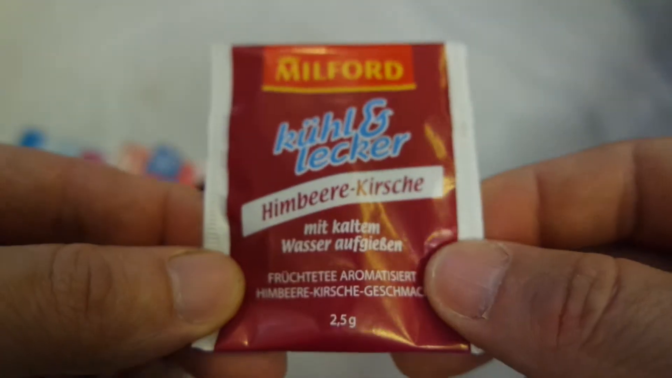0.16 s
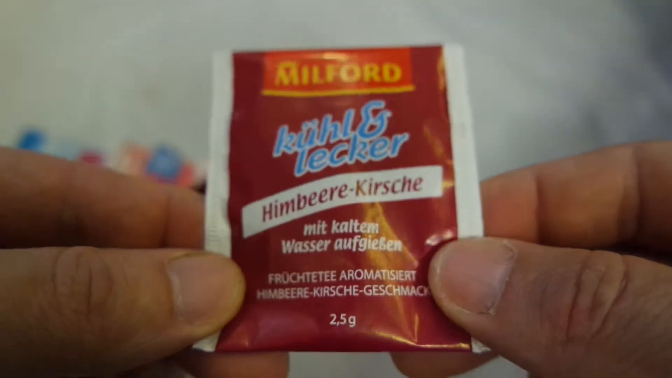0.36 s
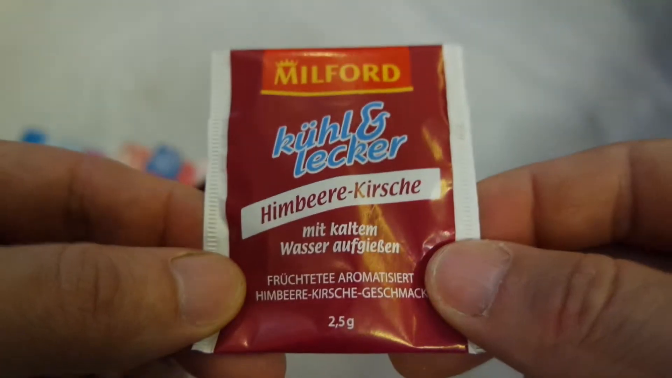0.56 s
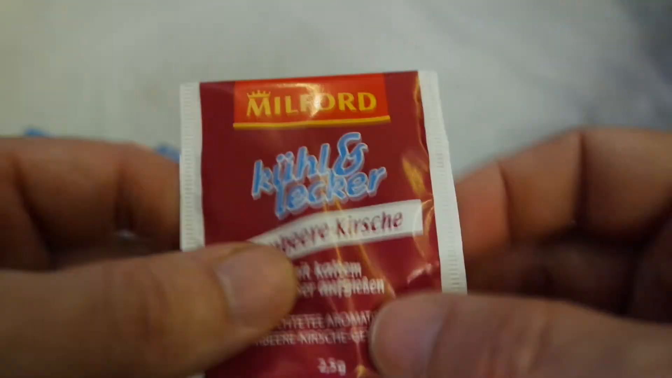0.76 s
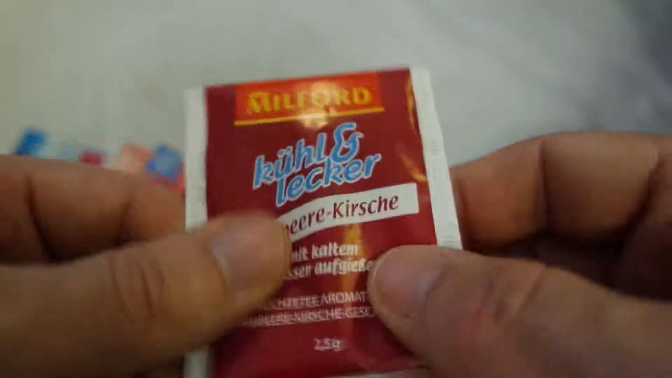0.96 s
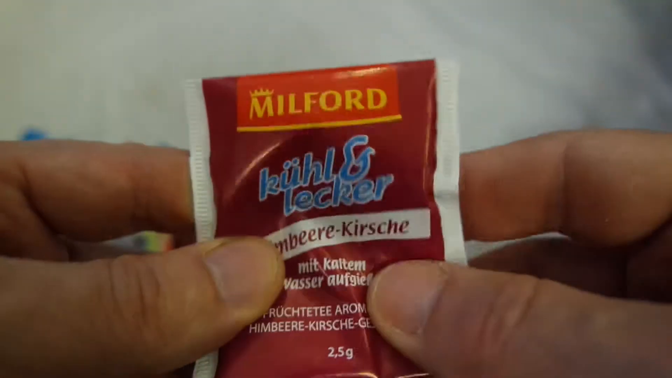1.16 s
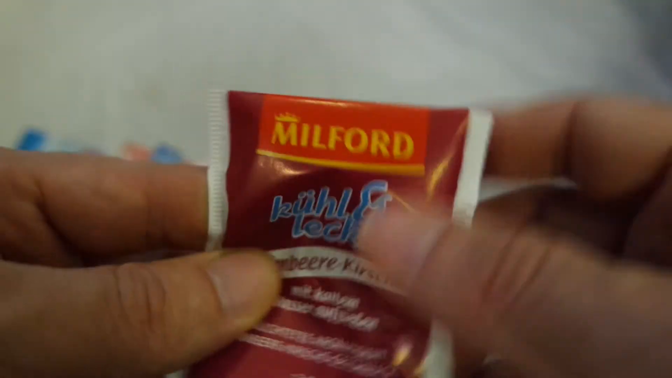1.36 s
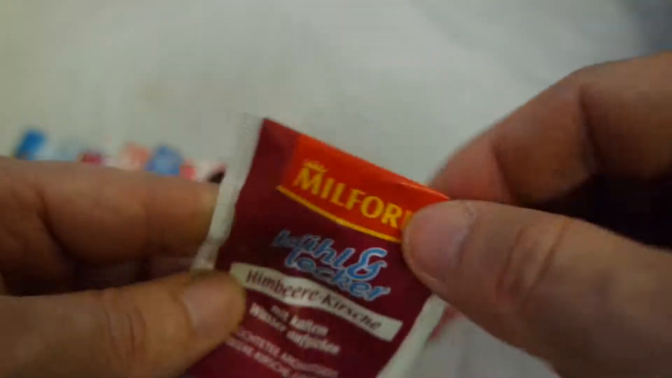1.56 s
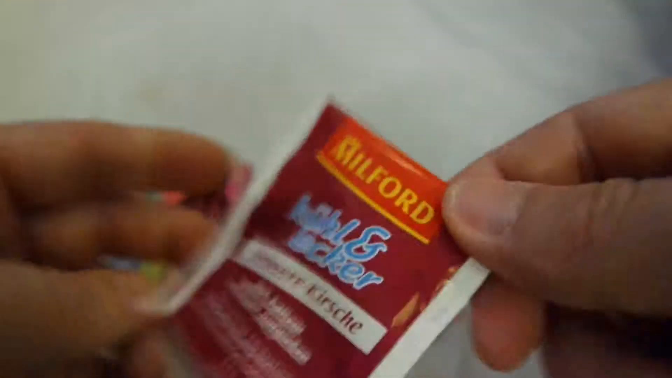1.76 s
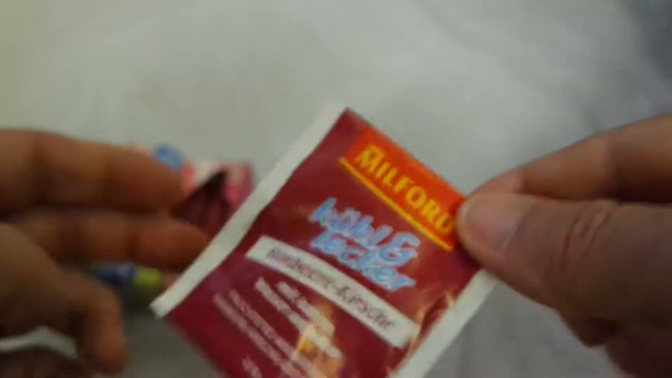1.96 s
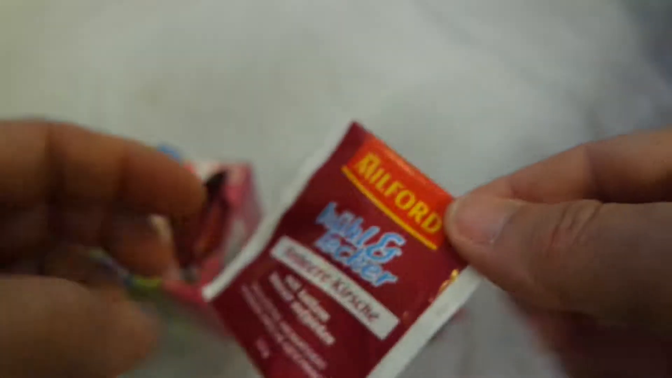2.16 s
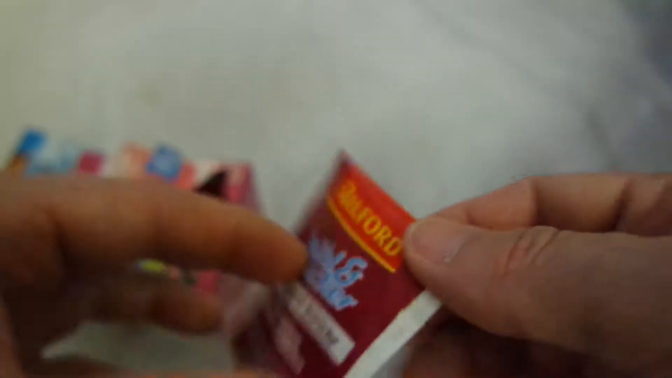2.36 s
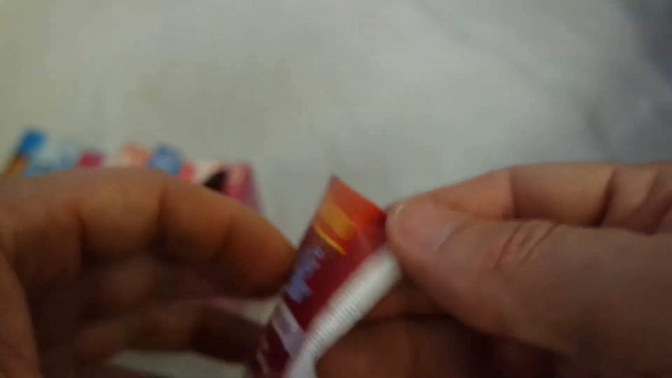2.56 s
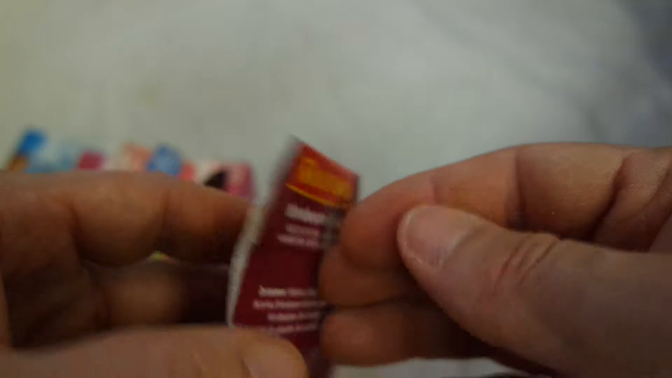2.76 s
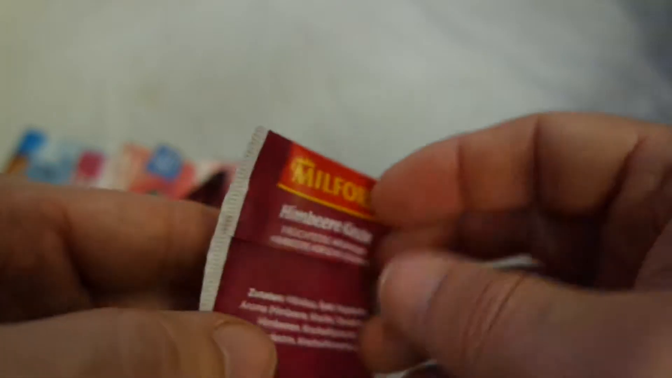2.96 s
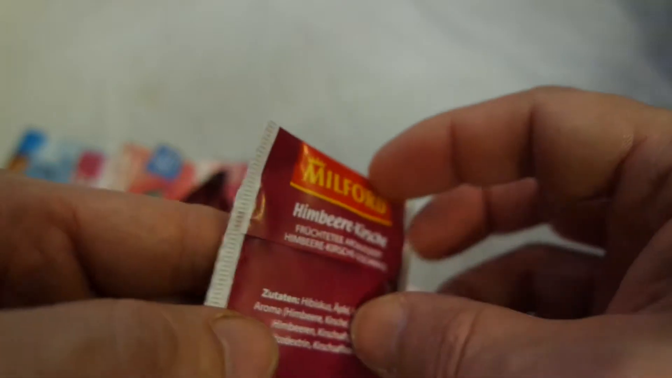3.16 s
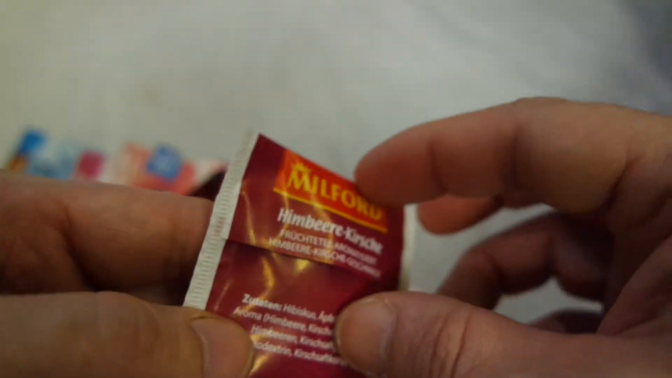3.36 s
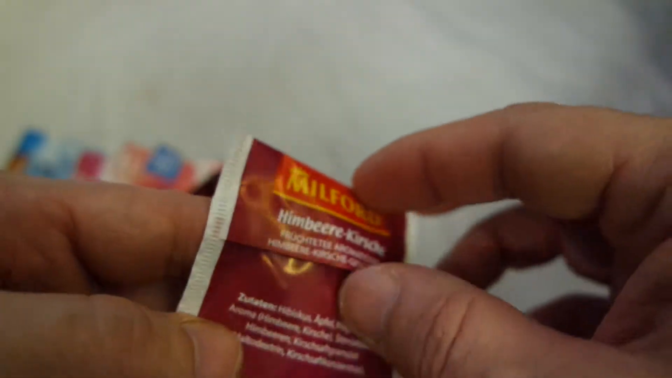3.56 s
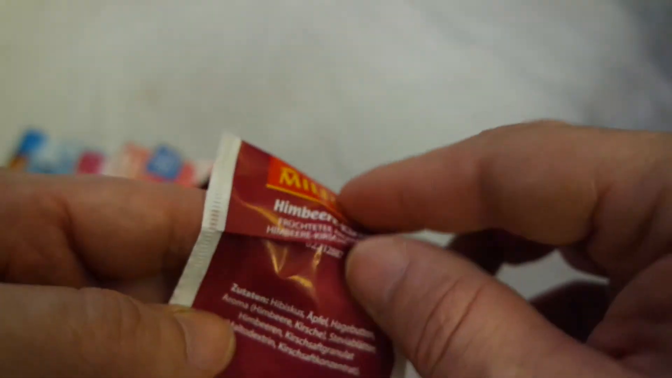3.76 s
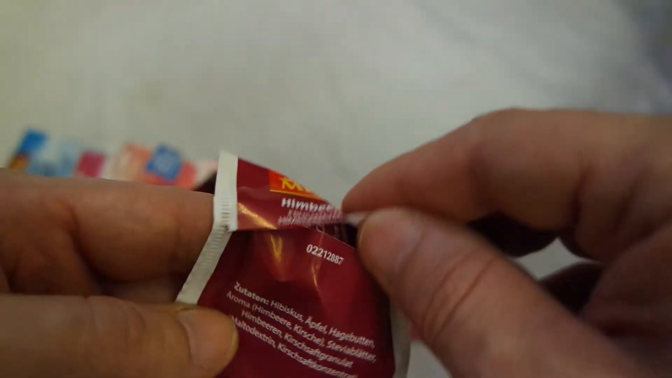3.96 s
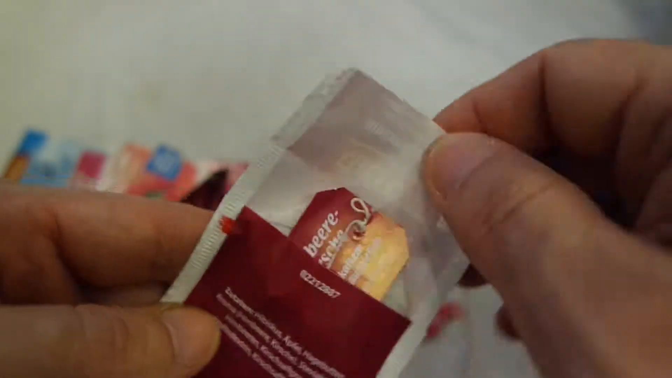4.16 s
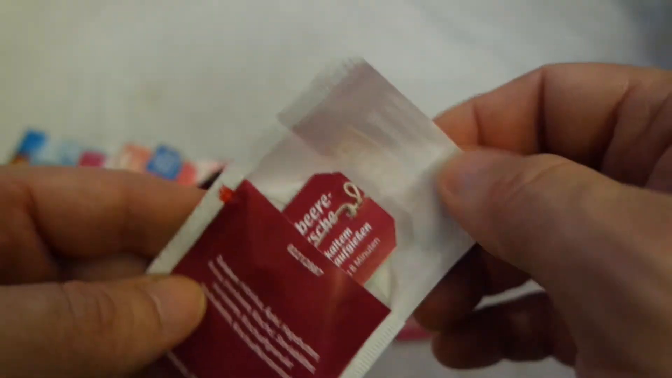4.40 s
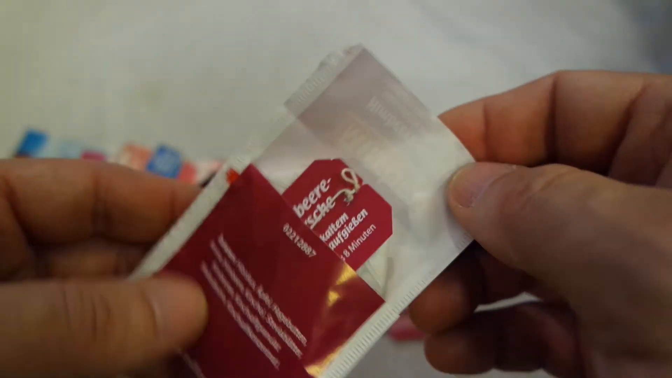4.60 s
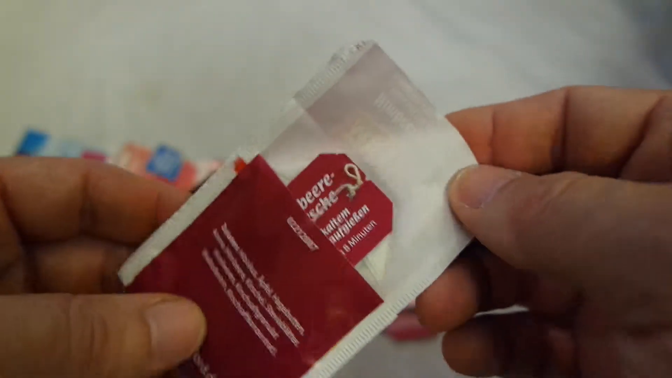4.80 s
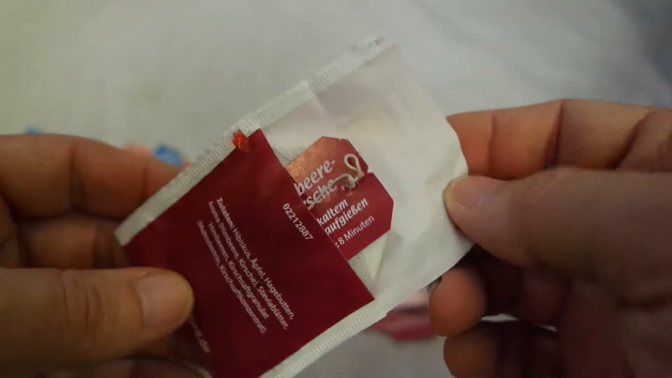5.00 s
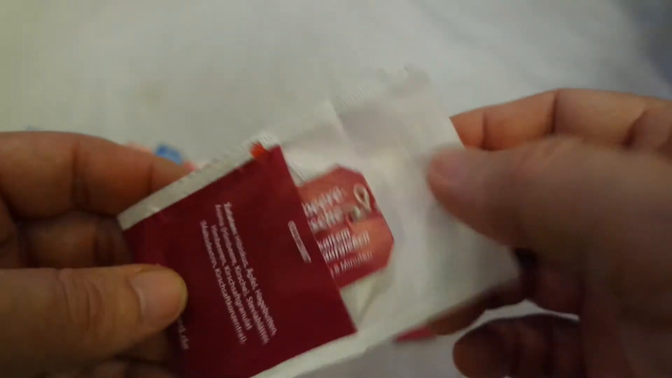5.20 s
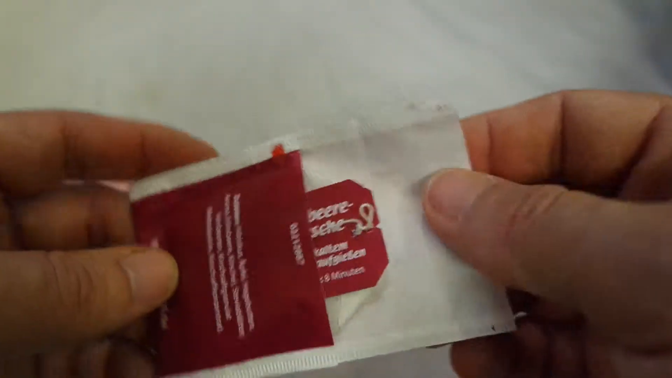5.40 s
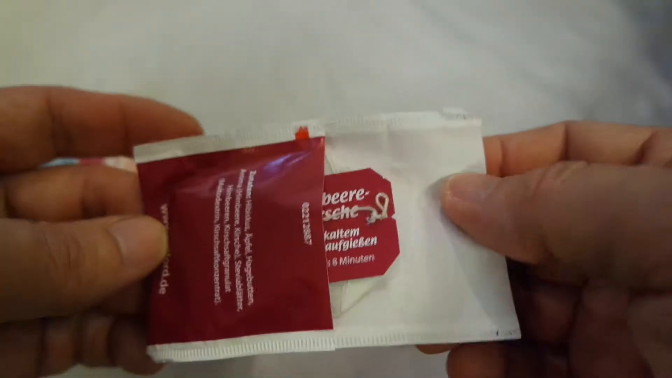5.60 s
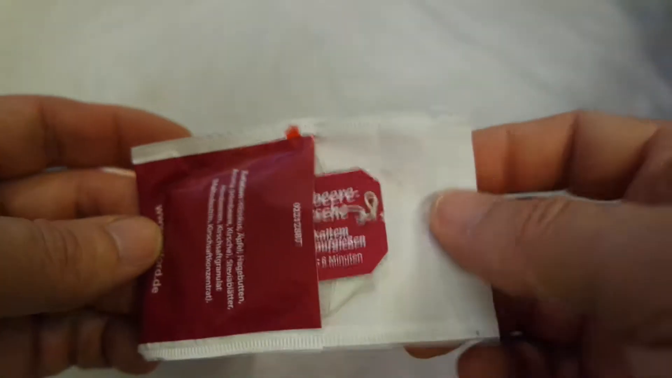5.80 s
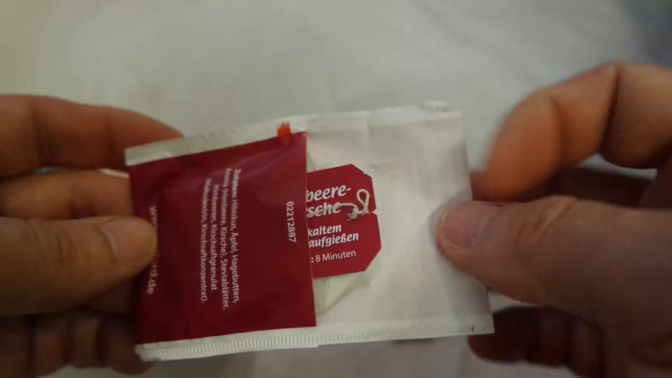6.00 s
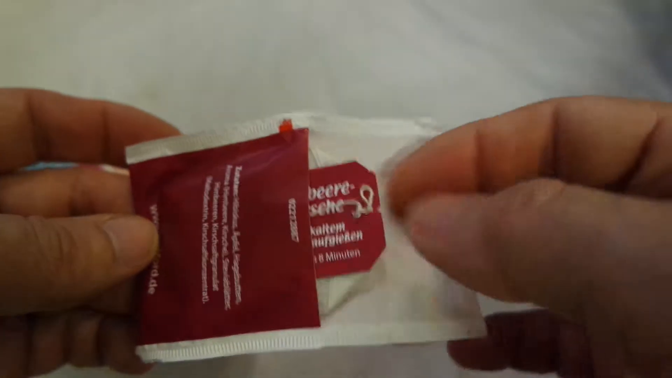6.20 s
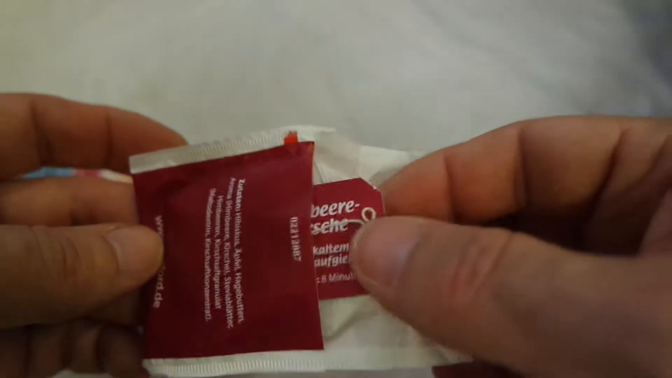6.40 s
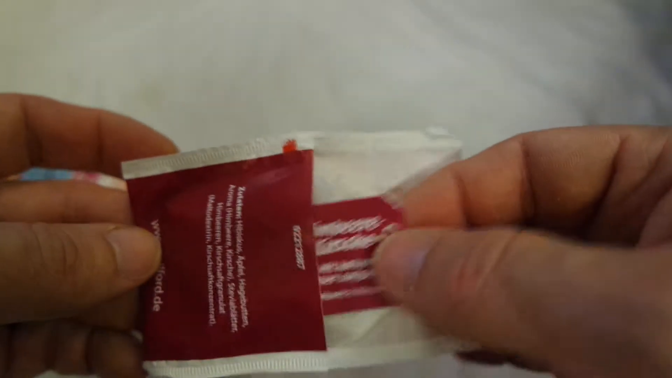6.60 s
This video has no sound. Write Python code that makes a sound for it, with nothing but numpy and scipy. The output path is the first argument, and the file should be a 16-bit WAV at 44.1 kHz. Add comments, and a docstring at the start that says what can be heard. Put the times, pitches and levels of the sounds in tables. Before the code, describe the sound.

Very close, crisp paper handling in a small quiet room, with faint low rumble and hiss beneath. At 0 s a brief light rub, a tiny tick near 0.3, then near-quiet. From 0.7 s the sachet is flexed: the loudest, densest crinkling runs about 0.8-1.5 s, sharp bright snaps over hissing finger strokes, with soft low puffs around 1.0 and 1.16. Snaps continue at 1.8-2.1, then separate groups near 2.4, 2.7-2.9 and 3.2, thinning to isolated clicks until 3.9. At about 4.05-4.25 s a very quick, ragged rip erupts among a tight cluster of snaps. Quieter crinkling follows, with another crackling group at 4.7-5.0, then sparse small ticks and faint rustles through 5.9. Light clicks come at 6.2, and a duller, soft sliding rustle with a couple of creases finishes from 6.5 s.

```python
"""A brief rub of stiff paper comes first, over low room noise; then two hands flex a tea sachet and rip it open.
Finger strokes make a sliding hiss under random tiny crackles, and larger creases snap as short ringing bursts.
The pouch puffs softly as it flexes: these are short bursts of low noise.
The rip is a dense run of breaking fibres whose level jumps at random; the crinkling goes on after it.
The table adds one dull early echo and the small quiet room adds a tail of fading noise."""
import sys
import numpy as np
from scipy import signal
from scipy.fft import rfft, irfft
from scipy.io import wavfile
from scipy.ndimage import uniform_filter1d

SR = 44100
rng = np.random.default_rng(int(sys.argv[2]) if len(sys.argv) > 2 else 0)


def unload_audio(sound):
    """Save the sound as a 16-bit wav file, at the path given as the first command line argument."""
    columns = np.transpose(np.atleast_2d(sound))
    # keep every value between -1 and 1, then stretch to whole-number steps
    steps = np.round(np.clip(columns, -1, 1) * 32767)
    wavfile.write(sys.argv[1], SR, steps.astype(np.int16))


N = 292824

# Signs that set the left channel against the right.
LEFT_RIGHT = np.array([[1], [-1]])


def undb(db):
    """Turn decibels into a gain."""
    return 10 ** (np.asarray(db) / 20)


def on_bins(hz, values, size):
    """Join points on a log-frequency axis and read them at the bins of a transform."""
    bins_hz = np.fft.rfftfreq(size, 1 / SR) + 1  # the 1 avoids log of zero
    return np.interp(np.log(bins_hz), np.log(hz), values)


def colour(points, size):
    """Turn (Hz, dB) points into a gain for each bin."""
    hz, db = np.transpose(points)
    return undb(on_bins(hz, db, size))


def causal(gain):
    """Give a gain curve minimum phase: a sharp attack first, then the ringing."""
    cepstrum = irfft(np.log(gain + 1e-9))
    half = len(cepstrum) // 2
    cepstrum[1:half] *= 2
    cepstrum[half + 1:] = 0
    return np.exp(rfft(cepstrum))


def stereo(mid, side, width, size):
    """Blend two unrelated spectra into left and right; more side makes the ears hear less alike."""
    share = colour(width, size)
    return (mid + LEFT_RIGHT * share * side) / np.sqrt(1 + share ** 2)


def add(out, start_s, sound):
    """Mix a sound in at a time."""
    start = max(int(start_s * SR), 0)
    part = sound[:, :max(N - start, 0)]
    out[:, start:start + part.shape[1]] += part


# How loud the quiet room's rumble and hiss are along the pitch range, before the overall level is set.
# Each row: frequency in Hz, level in dB.
FLOOR_COLOUR = [(25, 4.5), (50, 14.5), (100, -0.5), (250, 0.5), (650, -7.5), (900, -16), (1500, -15.5),
                (2200, -16), (4000, -19.5), (8000, -18.5), (15000, -21.5)]
# How unlike left and right are in the room's sound.
# Each row: frequency in Hz, side level minus middle level in dB.
ROOM_WIDTH = [(30, 3), (120, 1.5), (600, -6), (2200, -10), (4500, -0.5), (14000, 3.5)]
FLOOR_DB = -66


def floor():
    """Room rumble and faint hiss are steady random noise, coloured and set to one level."""
    white = rfft(rng.standard_normal((2, N)))
    noise = irfft(stereo(*white, ROOM_WIDTH, N) * colour(FLOOR_COLOUR, N), N)
    return noise / noise.std() * undb(FLOOR_DB)


# How unlike left and right are for paper close by.
# Each row: frequency in Hz, side level minus middle level in dB.
PAPER_WIDTH = [(100, -14), (600, -31.5), (2200, -30), (4000, -13), (8000, -1), (14000, -2.5)]
# Four frequencies in Hz: the paper's body lies under the first, its brightness over the last.
EDGES_HZ = [1102, 2440, 5230, 8500]
# Two frequencies in Hz: the bass hands over to the body between them.
BASS_EDGES_HZ = [257, 810]


def facet_ring(ring_hz, size, width_hz=740.0, db=9.0):
    """The stiff facet beside a crease rings briefly at its own pitch: a peak in its gain."""
    f = np.fft.rfftfreq(size, 1 / SR) + 1
    detune = (f * f - ring_hz * ring_hz) / (f * width_hz)
    power = 1 + undb(db) ** 2 / (1 + detune ** 2)
    middle = on_bins(EDGES_HZ, [0, 1, 1, 0], size)
    # level out the middle's average power so that the ring changes colour, not loudness
    return np.sqrt(power / np.average(power, weights=middle) ** middle)


def buckle(ms, kick=2.6, ring_db=-17, ring_ms=2.4, size=1024, smooth_bins=25):
    """A fold gives way with a kick, a flurry of micro-slips and a short random tail, new each time."""
    t_ms = np.arange(size) / SR * 1000
    fade = np.exp(-t_ms / max(ms, .1)) + undb(ring_db) * np.exp(-t_ms / ring_ms)
    slips = rng.standard_normal(size) * fade
    slips[0] += kick * rng.choice([-1, 1])
    spectrum = rfft(slips)
    # even out the broad colour, which is added later
    evening = uniform_filter1d(abs(spectrum) ** 2, smooth_bins) ** -.5
    return spectrum * causal(evening)


def crackles(rate, scatter_db, own_db=2.5, grain_ms=0.51, low_hz=2300, high_hz=4100, count=32, size=1024):
    """Tiny folds pop at random on many facets: stereo streams for bass, body, middle and brightness."""
    out = np.zeros((4, 2, N))
    facets = []
    for ring_hz in np.linspace(low_hz, high_hz, count):
        ring = causal(facet_ring(ring_hz, size, width_hz=250.0, db=9.5))
        pop = stereo(buckle(grain_ms), buckle(grain_ms), PAPER_WIDTH, size)
        facets.append(irfft(ring * pop))
    chance = rng.random(N - size)
    strength = rng.exponential(size=N)
    tint = rng.standard_normal((N, 4))
    which = rng.integers(count, size=N)
    for i in np.flatnonzero(chance < rate[:N - size] / SR):
        # each crackle has its own strength, and its own balance of the four streams
        db = scatter_db * min(strength[i], 3.5) + own_db * tint[i]
        out[:, :, i:i + size] += undb(db)[:, None, None] * facets[which[i]]
    return out


# How the rubbed paper colours its sound. Each row: frequency in Hz, level in dB.
RUSTLE_COLOUR = [(50, 3), (130, 2.5), (300, -3), (600, 7), (1100, -7.5), (1800, -1.5), (2400, 2),
                 (3300, 2.5), (4300, 0), (5500, -1), (7500, -0.5), (10000, 1.5), (13000, 5.5), (15000, 1)]
# The level in dB of a gentle touch, from which effort is counted.
GENTLE_DB = -48


def rustle(db, body_db, bright_db, rate, scatter_db, rub_db, pan_db,
           rate_per_db=0.13, bass_per_db=0.7, trims_db=(-1, -.5, -.5, -.5), size=1800):
    """Moving paper hisses softly under crackles that grow denser, louder and thinner with effort."""
    effort_db = db - GENTLE_DB
    pops_per_s = np.clip(rate * np.exp(rate_per_db * effort_db), 100, 3000)
    grains = crackles(pops_per_s, scatter_db)
    sliding = undb(rub_db)
    white = rfft(rng.standard_normal((2, N)))
    rub = sliding * irfft(stereo(*white, PAPER_WIDTH, N), N)
    # a taut sheet crackles without bass
    bass_db = body_db - bass_per_db * np.maximum(effort_db, 0)
    tones_db = [bass_db, body_db, 0, bright_db]
    # how much of each stream passes at the two bass edges and the four upper edges
    shares = [[1, 0, 0.063, 0, 0.16, 0],
              [0.2, 0.57, 1.0, 0.18, 0, 0.12],
              [0.0, 0.0038, 0.51, 0.65, 0.72, 0.0],
              [0, 0.06, 0.3, 0, 0.48, 0.74]]
    out = 0
    for stream, share, tone_db, trim_db in zip(grains, shares, tones_db, trims_db):
        # the crackles share the energy that the hands put in
        power = uniform_filter1d(np.mean(stream ** 2, axis=0), size)
        levelled = stream / np.sqrt(abs(power) + 0.26 * np.median(power))
        paper = (levelled + rub) / np.sqrt(1 + sliding ** 2)
        moving = rfft(paper * undb(db + tone_db + trim_db))
        out = out + moving * on_bins(BASS_EDGES_HZ + EDGES_HZ, share, N)
    return irfft(out * colour(RUSTLE_COLOUR, N), N) * undb(LEFT_RIGHT * pan_db / 2)


# The fingers bend or slide over the paper.
# Each row: start in seconds, length before it dies away in seconds, level in dB, brightness in dB.
STROKES = [(0, 0.0084, -47.5, 2.5), (0.056, 0.048, -56, -9), (0.18, 0.18, -61, -9),
           (0.709, .035, -46, -4.5), (.77, .04, -71, -6), (0.801, 0.13, -35.5, -3.5),
           (0.952, 0.064, -32, -4.5), (1.139, 0.13, -34, -1.5), (1.313, 0.023, -40, 4),
           (1.379, 0.25, -41.5, -1), (1.62, 0.28, -43, -2.5), (1.764, .07, -38.5, -24),
           (1.94, 0.13, -44.5, -11), (2.355, 0.066, -41, 2), (2.44, 0.3, -52, 1), (2.83, 0.027, -33, -5.5),
           (2.92, 0.15, -47.5, 1.5), (3.159, 0.2, -46, -5), (3.386, 0.15, -57, 1), (3.555, .04, -49, 2),
           (3.602, .025, -45.5, -2), (3.689, 0.081, -49, 2.5), (3.808, 0.017, -44, -2),
           (3.92, 0.22, -62.5, 9), (3.948, 0.023, -46, 2), (4.31, 0.19, -53, -3.5),
           (4.475, 0.03, -49.5, 10.5), (4.541, 0.082, -51.5, -1), (4.65, 0.24, -57.5, -2),
           (4.855, 0.056, -47, 3), (5.063, 0.145, -68, 4), (5.191, 0.03, -55.5, 5), (5.26, 0.23, -60, 3.5),
           (5.39, 0.1, -61, 1), (5.493, 0.079, -60.5, 3), (5.547, 0.084, -51, 6), (5.66, 0.096, -61.5, -1),
           (5.77, .05, -58.5, -4), (5.838, 0.0093, -50, 4), (5.889, 0.093, -59.5, 3),
           (6.144, 0.014, -56, -9), (6.24, 0.016, -61, -8), (6.294, 0.083, -52, -5),
           (6.433, 0.017, -58.5, 0.5), (6.543, 0.27, -41, -9)]
# Build-up time of a gentle stroke; softer strokes take longer, harder ones less.
ATTACK_S, RELEASE_DB_PER_S = .011, 195
# A snapped crease crackles on as it settles; its start is set against the snap's level.
SETTLE_DB, SETTLE_DB_PER_S = -49, 159.5
# Slack paper under a gentle touch has a full body; it thins as the hands pull it taut.
GENTLE_BODY_DB, THINNING_DB_PER_DB, RESTING_DB = 0.27, 0.3484, -81
# From the rip on, the loose wrapper sounds fuller.
OPEN_BODY_DB = 2.5


def handling(slowing=0.8):
    """Finger strokes and settling creases add their powers to drive the crinkling."""
    t = np.arange(N) / SR
    power, treble = np.full((2, N), undb(RESTING_DB) ** 2)
    for start_s, length_s, db, bright_db in STROKES:
        age = np.maximum(t - start_s, 0)
        attack_s = ATTACK_S * undb(slowing * (GENTLE_DB - db))
        fading_db = RELEASE_DB_PER_S * np.maximum(age - length_s, 0)
        stroke = np.minimum(age / attack_s, 1) * undb(db - fading_db)
        power = power + stroke ** 2
        treble = treble + (stroke * undb(bright_db)) ** 2
    kicks = np.zeros(N)
    for start_s, db, *_ in SNAPS:
        kicks[int(start_s * SR)] = undb(db + SETTLE_DB) ** 2
    settling = signal.lfilter([1], [1, -undb(-SETTLE_DB_PER_S / SR) ** 2], kicks)
    db, treble_db = 10 * np.log10([power + settling, treble + settling])
    body_db = GENTLE_BODY_DB - THINNING_DB_PER_DB * (db - GENTLE_DB)
    body_db = body_db + OPEN_BODY_DB * (t > RIP_S)
    return rustle(db, body_db, treble_db - db, rate=420, scatter_db=6.0, rub_db=-2, pan_db=-1.6)


def table_top(dry, delay_ms=2.597, db=-15, dull_hz=3000):
    """The table under the hands returns one early echo, dulled by a gentle treble cut."""
    hz = np.fft.rfftfreq(N, 1 / SR)
    lag = np.exp(-2j * np.pi * hz * delay_ms / 1000)
    return undb(db) * irfft(rfft(dry) * lag / (1 + 1j * hz / dull_hz), N)


# How the room's tail fades in each pitch range.
# Each row: centre frequency in Hz, time to fade by 60 dB in seconds, level in dB.
ROOM_BANDS = [(150, 1, -15), (685, 0.11, -5.5), (2830, 0.28, -15), (6800, 0.2, -10), (14000, 0.11, -4.5)]


def room(dry, gap_s=0.0023, size=16384):
    """Near walls return a dense short tail of fading noise, with the bass lingering longest."""
    t, response = np.arange(size) / SR, 0
    centres_hz = [row[0] for row in ROOM_BANDS]
    for share, (_, t60_s, db) in zip(np.eye(len(ROOM_BANDS)), ROOM_BANDS):
        swell = 1 - np.exp(-(t / gap_s) ** 2)
        fade = undb(-60 * t / t60_s) * swell
        tails = rfft(rng.standard_normal((2, size)) * fade / np.linalg.norm(fade))
        band = np.sqrt(on_bins(centres_hz, share, size))
        response = response + undb(db) * stereo(*tails, ROOM_WIDTH, size) * band
    mono = dry.mean(axis=0)[None]
    return signal.fftconvolve(mono, irfft(response), axes=1)[:, :N]


# How a snapping crease colours its sound. Each row: frequency in Hz, level in dB.
SNAP_COLOUR = [(60, -25), (220, -12), (450, -3.5), (650, 1), (1100, -0.5), (1600, 2), (2400, 1),
               (3200, 0.5), (4300, -1.5), (5500, -2), (7500, -3.5), (10000, -4), (13000, -1), (15000, -7)]
# Creases that snap through, and, from 4.10 to 4.24 s, the loudest snaps of the running tear. # Each row: start
# in seconds, level in dB, body in dB, brightness in dB, ring in Hz, length in milliseconds.
SNAPS = [(0.277, -24.5, 0, 7, 4360, 0.24), (0.7302, -17.5, 0.5, -24, 2550, 0.83),
         (0.81, 8, -8.5, -4.5, 3450, 0.5), (0.835, -13, 9.5, -6.5, 2850, 2.6),
         (0.8552, -11, 0.5, -20.5, 1950, .7), (0.9144, -1.5, 4, 2, 2430, 0.76),
         (0.9251, -12.5, 17, -6, 2280, 1.6), (0.9564, -6.5, -4, 0, 3800, .8),
         (0.9606, -2.5, -1, -1, 3020, 1.7), (0.9798, 1, -6, -2.5, 2210, 1.9),
         (0.9925, 1.5, -3, -5, 2400, 4.9), (1.0252, 4, -8.5, -53, 2740, 0.28),
         (1.0557, -6, -2, -19, 1870, 0.51), (1.081, -1.5, 1.5, -5.5, 3100, 0.62),
         (1.1136, -3.5, -23, -3, 4000, 0.89), (1.153, 6, 1.5, -3, 2990, 1.9),
         (1.1589, 8, -4, -5, 4350, 2.4), (1.2171, 6, -15, -9, 3130, 0.77),
         (1.2279, 8.5, -16, -3.5, 2550, 0.71), (1.2478, 0, -18, -7, 3340, 1.8),
         (1.262, -1.5, -5, -4, 2650, 2.1), (1.3079, -4.5, -15, -2, 3320, 1.5),
         (1.3366, -16, -2.5, 6.5, 3000, 0.67), (1.351, -3.5, -2.5, -0.5, 2380, 2.3),
         (1.3946, -0.5, -21, 6, 3550, 0.51), (1.4253, 0, -13, -26, 3370, 0.49),
         (1.4828, 8, -4.5, -0.5, 2870, 1.1), (1.5098, -3, -26, -23, 2650, 0.64),
         (1.5578, -8.5, 3, -20, 3380, 0.32), (1.6241, 2.5, -5.5, 5.5, 4550, 0.82),
         (1.7902, -9.5, 7, -30, 3780, 0.37), (1.818, 1, -3, 0, 5530, 0.74),
         (1.8299, 3.5, -28, -11, 3480, .45), (1.848, -7.5, 7, 0, 2380, .7),
         (1.8662, 4.5, -17, -3.5, 3300, 1.1), (1.9074, .5, -3, -2.5, 3720, 0.84),
         (1.9781, 3.5, -6, -3, 4940, 0.86), (1.9943, -3, 1, 0, 4870, 2.5),
         (2.0361, 1, -11, -4, 3950, 2.6), (2.0473, -6, 3.5, -3, 2950, 1.1),
         (2.1156, -8.5, 3.5, -15, 4000, 1.3), (2.3685, .5, -4, 0.5, 4430, 2.5),
         (2.3837, -2.5, -1.5, -7, 5160, 0.73), (2.418, -2.5, -4, 0, 3200, 1.1),
         (2.4937, -14, 0.5, -7, 4200, 1.6), (2.5486, -9.5, -3.5, -3, 4300, 1.1),
         (2.603, -10, -1.5, -21, 3600, 0.46), (2.6281, -9, 6, -8, 3300, 0.54),
         (2.6437, -21.5, 14.5, 4, 1930, 0.69), (2.7306, -4, -3, 8.5, 3950, 1.1),
         (2.7349, 3.5, -9, -13, 3740, 4), (2.799, -17, -1, -14, 1910, 0.86),
         (2.853, 0, -3.5, 1, 3560, 13), (2.913, -4.5, -11, -5, 4030, 1.1),
         (2.9306, -17, -28, 6, 3050, 1.2), (2.9523, -11.5, -1, 8, 2700, 1.1),
         (3.0031, -7.5, -3.5, -8, 3600, 1.1), (3.0804, -4.5, -21, -7, 3500, 0.51),
         (3.156, 0, -11.5, 0.5, 3500, .8), (3.1647, 2.5, -3, -4.5, 3950, 1.6),
         (3.174, -5, -27, -2, 3550, .45), (3.1896, 3, -16, -6, 3260, 0.54),
         (3.3368, -7.5, -3.5, -8.5, 4000, 2), (3.426, -18.5, -25, 3, 5300, .75),
         (3.6252, -6.5, -7, -39, 2750, 0.13), (3.6975, -9.5, -9, -7, 3600, 0.48),
         (3.75, -1.5, 3.5, -4.5, 2920, .4), (3.8378, -11, -7, 8, 3850, .5),
         (3.855, 6, -7.5, 1.5, 3470, 0.2), (3.976, -7.5, -14, -5, 3470, 1.1),
         (4.0425, -6.5, -35, 0, 3770, 0.66), (4.0571, -8.5, -7, 2, 2660, 1.6),
         (4.098, -1.5, -5, -3, 2540, 1.3), (4.1016, 2, -8, -1, 2840, 5.2), (4.147, 2, 0, 6.5, 4200, 8),
         (4.1632, 8, -9.5, -14, 3850, .6), (4.184, 4, -32, 6, 3170, 3.4),
         (4.1916, 3.5, -28, 6.5, 3660, 1.4), (4.233, -4.5, 0, 8, 3370, 1.5),
         (4.387, -19, -15, 2, 4500, 1), (4.622, -34, 23, -7, 2500, 1.9),
         (4.678, -31, 16, -11.5, 2520, 1.9), (4.7205, 5, -20, -14, 3600, 1.3),
         (4.7964, -20.5, -15, 4, 5400, 1.1), (4.8587, .5, 1.5, -19, 2620, 0.52),
         (4.8724, -13, -1.5, -5, 3950, 0.98), (4.9013, -.5, 1, -4, 4100, 1.2),
         (4.9325, -6, 4.5, -4.5, 4130, 1.8), (4.9834, 3.5, -1, 6, 3100, 0.9),
         (5.428, -32, 16, 0.5, 2260, 1.4), (5.5492, -9.5, -0.5, -19, 3300, 0.74),
         (5.6367, -16.5, -7, -2, 5700, 1.5), (5.7853, -7.5, -4.5, -9.5, 3400, 1),
         (5.8625, -21.5, 9, 2, 4200, 3.7), (5.904, -32, 23, 11, 3500, 1.9),
         (6.1642, -19, 7.5, -4.5, 5250, 2.2), (6.1785, -7.5, 0, -3.5, 4150, 3),
         (6.2405, -1, -8, -6, 4120, 3), (6.561, -5, -4, -9, 3800, 16), (6.6151, -6, -1.5, 2, 3630, 2.7)]


def snaps(thin=0.83, crisp_hz=13000, pan_db=-1.5, wander_db=1.16, size=1024):
    """Single creases, and the loudest snaps of the tear, pop through, each with its own size, colour, ring and
    place on the sheet."""
    out = np.zeros((2, N))
    tilt_hz = BASS_EDGES_HZ + EDGES_HZ + [crisp_hz]
    for start_s, db, body_db, bright_db, ring_hz, ms in SNAPS:
        bass_db = body_db + thin * min(body_db, 0)  # small facets radiate almost no bass
        tilt_db = [bass_db, body_db, body_db, 0, 0, bright_db, bright_db]
        tilt = undb(on_bins(tilt_hz, tilt_db, size))
        tone = colour(SNAP_COLOUR, size) * tilt * facet_ring(ring_hz, size)
        pop = stereo(buckle(ms), buckle(ms), PAPER_WIDTH, size) * causal(tone)
        place_db = pan_db + wander_db * rng.standard_normal()  # left minus right
        add(out, start_s, irfft(pop) * undb(db + LEFT_RIGHT * place_db / 2))
    return out


# The whole pouch gives way under the fingers.
# Each row: start in seconds, level in dB before a common trim, depth (bass over upper bass) in dB.
PUFFS = [(0.959, 1.5, 0), (.987, 8.5, 3), (1.159, 17.5, 1), (1.249, -4, -7), (1.355, -.5, -3),
         (1.481, 6, -8), (2.381, 0, 11.5), (2.626, -18, -13), (2.732, 6, -7), (4.236, 0.5, -20),
         (4.487, -2, -3), (4.858, -3, 11), (4.982, 2.5, -5.5), (5.548, -5.5, -10.5), (5.861, -3, -8),
         (5.902, -4, -4), (6.185, 0.5, -2), (6.241, 5.5, -4), (6.613, -6, -11)]


def flexes(trim_db=-1, puff_ms=2.94, low_hz=110, high_hz=330, size=4096, smooth_bins=9):
    """The pouch's walls flip and push a soft puff of air: a quickly fading burst of low noise."""
    out = np.zeros((2, N))
    t_ms = np.arange(size) / SR * 1000
    for start_s, db, depth_db in PUFFS:
        push = rfft(rng.standard_normal(size) * np.exp(-t_ms / puff_ms))
        tone = colour([(35, -22), (low_hz, depth_db / 2), (high_hz, -depth_db / 2 - 4.5),
                       (600, -10), (1500, -36), (6000, -70)], size)
        evened = tone / np.sqrt(uniform_filter1d(abs(push) ** 2, smooth_bins))
        puff = irfft(push * causal(evened))
        add(out, start_s, undb(db + trim_db) * np.array([puff, puff]))
    return out


# The rip swells up to its start time, runs across the sachet and stops at the far edge.
RIP_S, RIP_LENGTH_S, RIP_DB = 4.15, 0.051, -25
RIP_SWELL_DB_PER_S, RIP_FADE_DB_PER_S = 234, 360
# It grows fuller and brighter as the pouch opens. Each pair: dB at the start, dB at the end.
RIP_BODY_DB = -10, 2.5
RIP_BRIGHT_DB = (-1, 3)


def rip(lowest_hz=300, catch_db=3.0, count=220):
    """The tear catches and runs in a volley of breaking fibres, too small to radiate bass."""
    t = np.arange(N) / SR - RIP_S
    swell_db = RIP_SWELL_DB_PER_S * np.maximum(-t, 0)
    fade_db = RIP_FADE_DB_PER_S * np.maximum(t - RIP_LENGTH_S, 0)
    db = RIP_DB - swell_db - fade_db
    # smoothed noise makes the level jump as the tear catches
    catches = uniform_filter1d(rng.standard_normal(N), count) * np.sqrt(count)
    body_db = np.interp(t, [0, RIP_LENGTH_S], RIP_BODY_DB)
    bright_db = np.interp(t, [0, RIP_LENGTH_S], RIP_BRIGHT_DB)
    fibres = rustle(db + catch_db * catches, body_db, bright_db,
                    rate=600, scatter_db=4.0, rub_db=-5.5, pan_db=-0.5)
    bass_cut = signal.butter(2, lowest_hz, "high", fs=SR, output="sos")
    return signal.sosfilt(bass_cut, fibres)


def scene():
    """The sachet in the hands sounds with its table echo, its room and the quiet behind it."""
    sachet = handling() + snaps() + flexes() + rip()
    return sachet + table_top(sachet) + room(sachet) + floor()


def record(dry, top_hz=15100):
    """A steep filter cuts off the very top of the treble."""
    treble_cut = signal.ellip(10, .1, 70, top_hz, fs=SR, output="sos")
    return signal.sosfilt(treble_cut, dry)


dry = scene()
out = record(dry)
unload_audio(out)
```